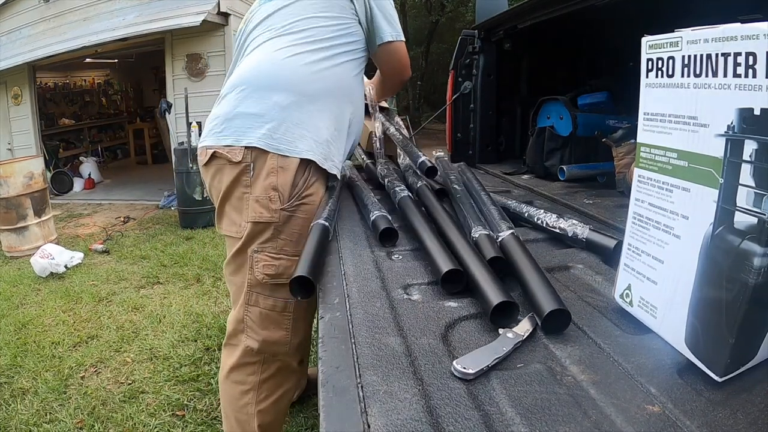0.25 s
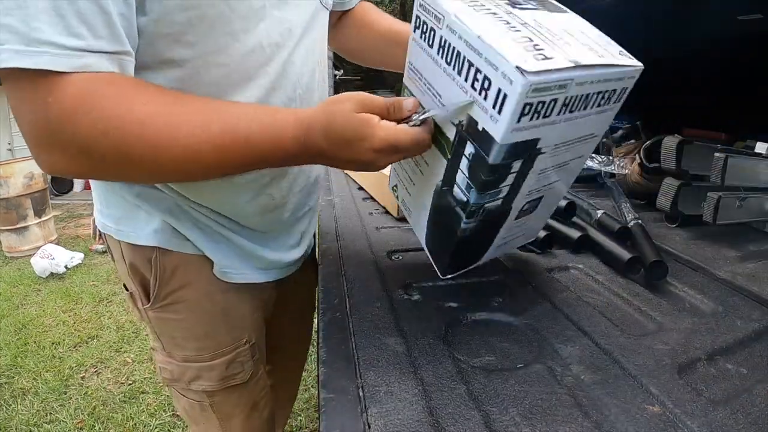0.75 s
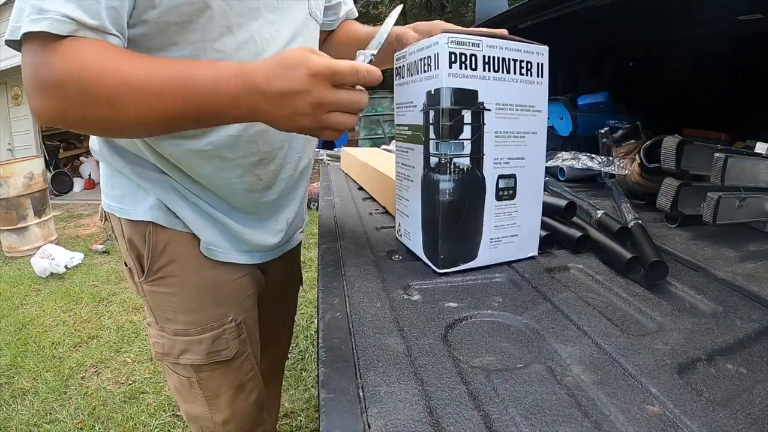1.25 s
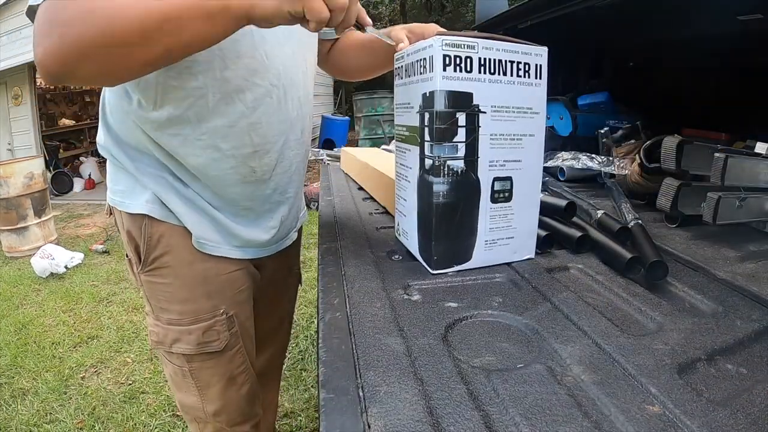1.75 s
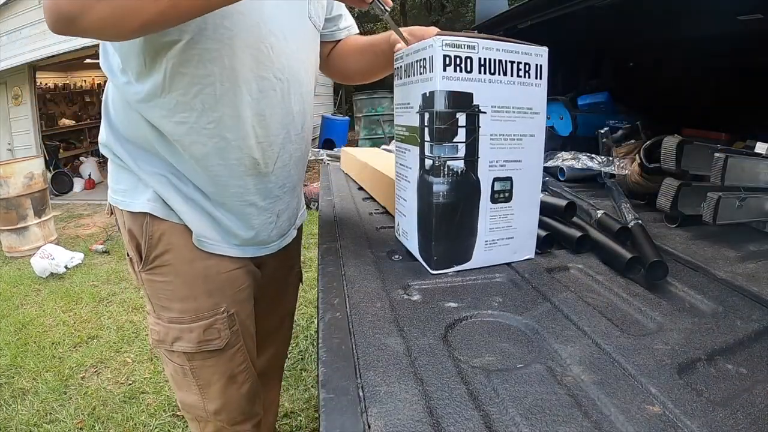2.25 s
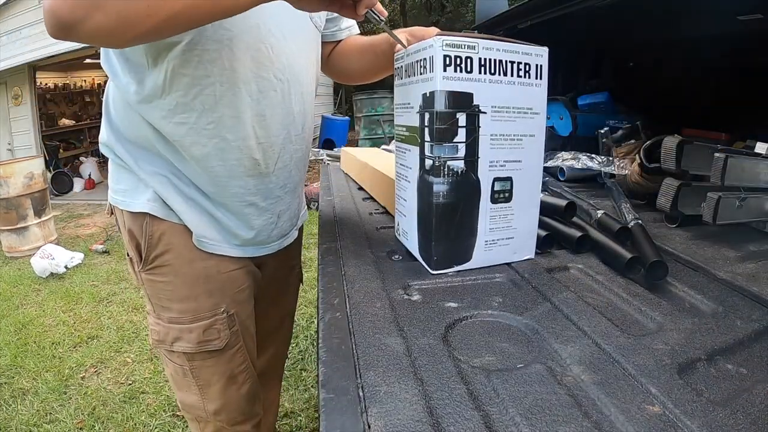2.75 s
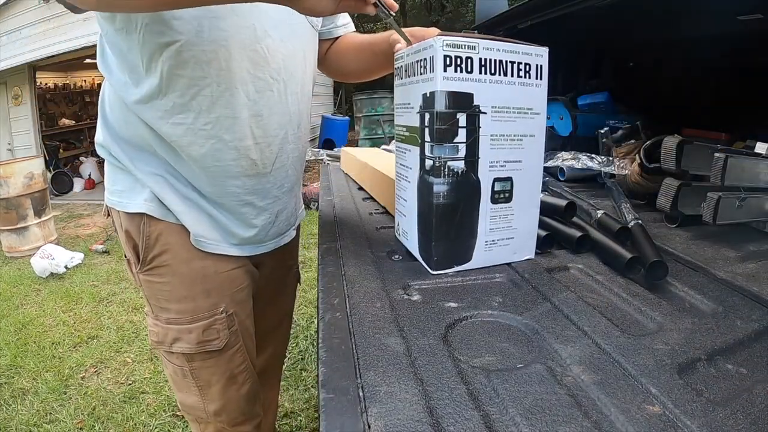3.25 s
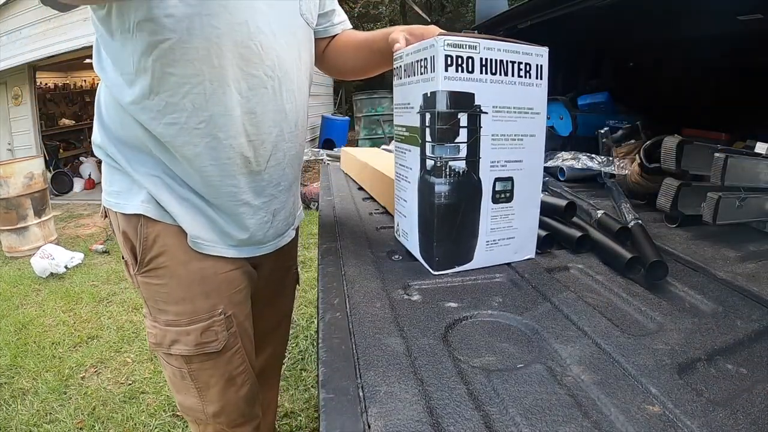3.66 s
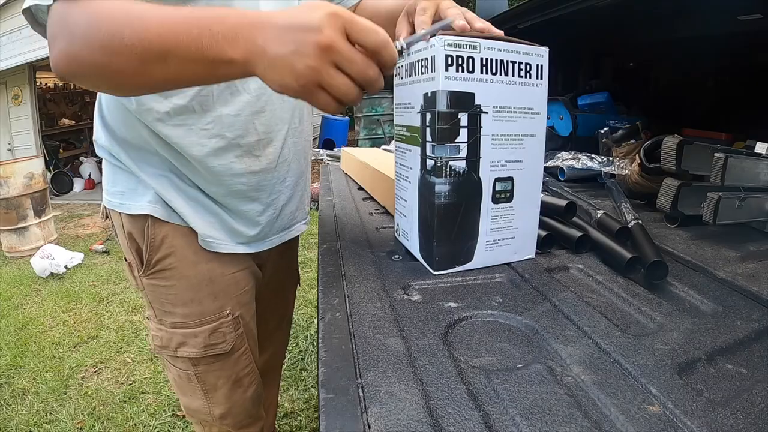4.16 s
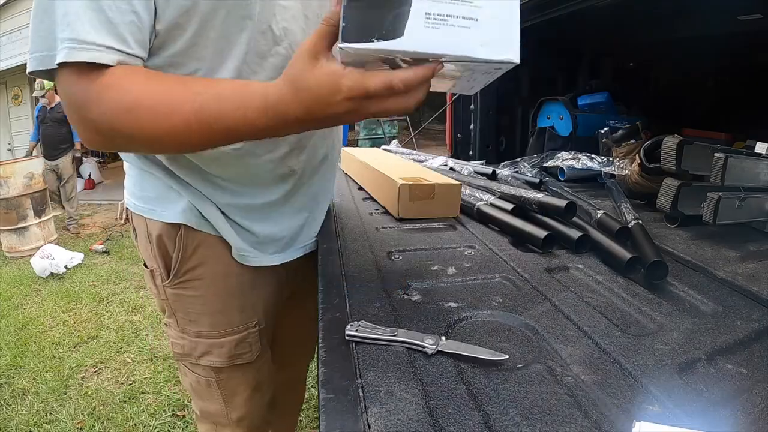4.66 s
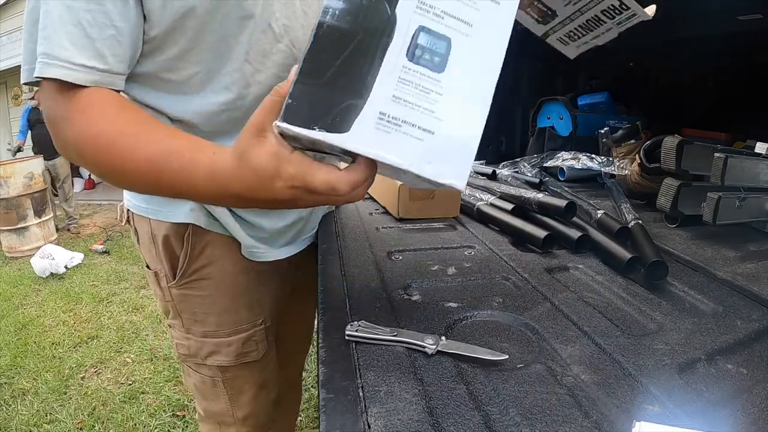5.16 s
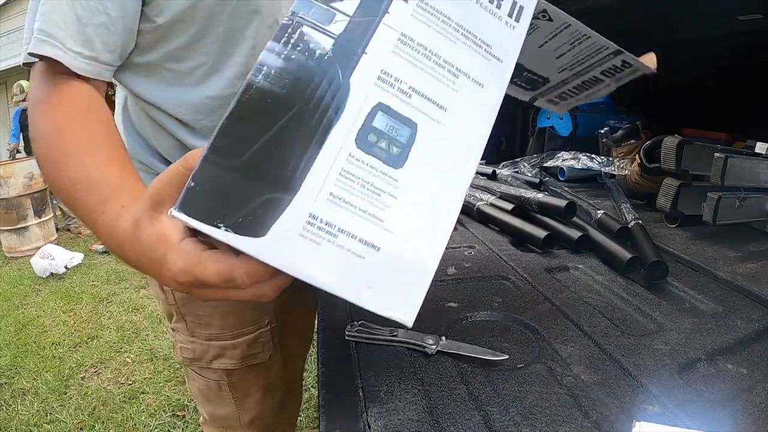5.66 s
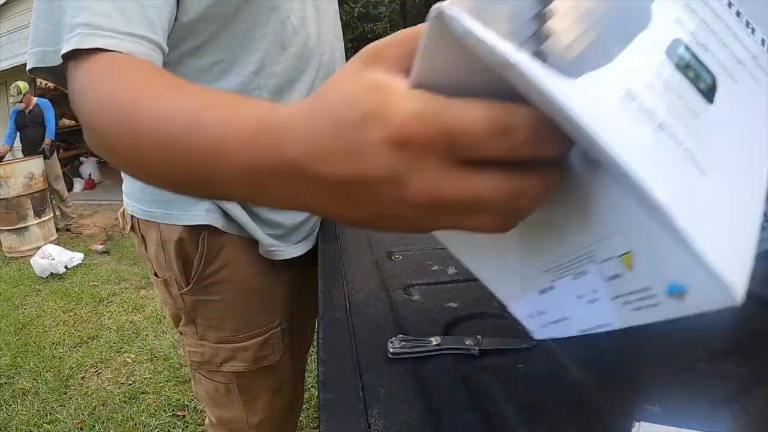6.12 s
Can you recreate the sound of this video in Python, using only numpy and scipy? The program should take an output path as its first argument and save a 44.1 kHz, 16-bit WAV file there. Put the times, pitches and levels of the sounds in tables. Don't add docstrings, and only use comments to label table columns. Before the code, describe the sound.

A burst of ringing metal pipes over sheet-steel thumps is cut short, and a carton drops onto the bed and rocks. After a near-quiet gap with low engine rumble, a small motor's throb and thin cicada hiss, sharp cracks open the carton. One bright metallic click follows, then cardboard scraping, squeaky edges and deep hollow thumps, captured close outdoors.

```python
import sys
import numpy as np
from scipy import signal
from scipy.fft import rfft, irfft, next_fast_len
from scipy.io import wavfile
from scipy.ndimage import uniform_filter1d

SR = 44100
rng = np.random.default_rng(int(sys.argv[2]) if len(sys.argv) > 2 else 0)


def gain_from_db(level_db):
    decades = np.asarray(level_db, float) / 20
    return 10 ** decades


def to_wav(sig):
    pcm = np.clip(np.atleast_2d(sig), -1, 1) * 32767
    pcm = np.round(pcm).astype(np.int16)
    wavfile.write(sys.argv[1], SR, pcm.T)


N = 281799
T = np.arange(N) / SR
PAD = next_fast_len(N + 8192)


def level(x, db):
    return x * gain_from_db(db) / np.sqrt(np.mean(x ** 2))


def colour(x, points):
    hz, db = np.transpose(points)
    log_hz = np.log(np.maximum(np.fft.rfftfreq(PAD, 1 / SR), 1))
    gain = gain_from_db(np.interp(log_hz, np.log(hz), db))
    return irfft(rfft(x, PAD) * gain, PAD)[..., :N]


def band(x, lo_hz, hi_hz):
    sos = signal.butter(2, [lo_hz, min(hi_hz, 0.45 * SR)], "band", fs=SR, output="sos")
    return signal.sosfilt(sos, x)


def walk(rate):
    k = int(SR / rate)
    held = np.repeat(rng.standard_normal(N // k + 1), k)
    return 1.58 * uniform_filter1d(uniform_filter1d(held, k), k)[:N]


def fade(t60, count):
    return np.exp(-np.log(1000) * np.arange(count) / SR / t60)


def ring(modes, scatter_db, count, rise=0.0031, detune=0.0023, loose=2, start=0):
    t = np.arange(count) / SR
    hz, db, t60 = np.transpose(modes)[:, :, None]
    luck = rng.standard_normal((3, len(modes), 1))
    swing = np.sin(2 * np.pi * hz * (1 + detune * luck[2]) * (t + start) + loose * luck[1])
    tones = gain_from_db(db + scatter_db * luck[0]) * np.exp(-np.log(1000) * t / t60) * swing
    return tones.sum(axis=0) * (1 - np.exp(-t / rise))


def burst(lo_hz, hi_hz, t60, count):
    x = rng.standard_normal(count) * fade(t60, count) * (1 - fade(t60 / 3, count))
    x = band(band(x, lo_hz, hi_hz), lo_hz, hi_hz)
    return x / np.abs(x).max()


def add(out, s, x):
    i = int(s * SR)
    out[i:i + len(x)] += x[:N - i]


def grit(rate, spread_db):
    slips = (rng.random(N) < rate / SR) * rng.standard_normal(N)
    return slips * gain_from_db(spread_db * rng.exponential(size=N))


def tuned(hz, rows):
    return np.column_stack([hz, rows])


# start in seconds, then levels in dB of the crack, the bed thud,
# the ring of the first tube and the ring of the second.
CLANKS = [(0.0045, -17, -19, -28, -48), (0.0136, -32, -9, -42, -49), (0.0617, -27, -14.5, -18, -43),
          (0.0798, -31, -16, -18, -29), (0.094, -21, -20, -28, -22), (0.1291, -28, -18.5, -27, -35),
          (0.164, -36, -19.5, -28.5, -36), (0.2526, -15.5, -14, -23.5, -27.5),
          (0.2826, -7, -27, -20.5, -25.5), (0.3212, -20, -10.5, -60, -42), (0.3467, -60, -14.5, -59, -32.5),
          (0.3734, -62, -22.5, -57, -32), (0.515, -44, -45, -41, -45), (0.033, -39, -22, -33, -42),
          (0.112, -22, -18.5, -32, -47), (0.44, -60, -34, -49, -49)]
# level in dB, t60 in seconds.
TUBE_A_HZ = [1184, 1930, 2234, 2480, 2786, 3225, 3278, 3516, 3849, 3887, 4457, 4565, 4985, 5259]
TUBE_A = [(0, 0.21), (-22.5, 0.18), (-23, 0.52), (-26, 0.47), (-8.5, 0.18), (-21, 0.25), (-21, 0.48),
          (-3.5, 0.17), (-24, 0.39), (-12, 0.16), (-15, 0.17), (-27, 0.21), (-24, 0.33), (-14.5, 0.14)]
TUBE_B_HZ = [1187, 1927, 1967, 2013, 2089, 2471, 2778, 2842, 3354, 3565, 3871, 3937, 4554, 4648]
TUBE_B = [(-9.5, 0.57), (-10.5, 0.58), (-11, 0.36), (-19.5, 0.71), (-21, 1.1), (-13.5, 0.55), (-20, 0.61),
          (-27.5, 1.7), (-25, 0.85), (-12.5, 0.36), (-18, 0.27), (-18, 0.8), (-23, 0.49), (-20, 0.28)]
RIMS_HZ = [926, 2261, 2363, 2546, 3990, 5368, 5610, 6121, 6218, 6342, 6724, 7402, 8387, 8656]
RIMS = [(-19, 0.17), (-31, 0.45), (-26, 0.58), (-28, 0.26), (2.5, 0.052), (-8.5, 0.25), (-21.5, 0.57),
        (-30.5, 0.32), (-22, 0.26), (-16, 0.31), (-26, 0.43), (-16, 0.22), (-6, 0.12), (-12, 0.045)]
# frequency in Hz, level in dB, t60 in seconds.
BED = [(97.5, -11, 0.15), (157.6, 4.5, 0.12), (206, -1.5, 0.33), (285, -4.5, 0.12), (382, -15, 0.24),
       (459.3, -6.5, 0.18), (740, 3.5, 0.027)]


def tubes():
    out = np.zeros(N)
    tube_a, tube_b, rims = tuned(TUBE_A_HZ, TUBE_A), tuned(TUBE_B_HZ, TUBE_B), tuned(RIMS_HZ, RIMS)
    luck = rng.random((30, 2))
    pile = np.transpose([1400 * 5 ** luck[:, 0], -24 - 8 * luck[:, 0], 0.036 + 0.21 * luck[:, 1] ** 2])
    for s, crack_db, thud_db, a_db, b_db in CLANKS:
        loudest_db = max(a_db, b_db)
        rings = gain_from_db(a_db) * ring(tube_a, 1.7, count=18000, detune=0, loose=0.74, start=s)
        rings += gain_from_db(b_db) * ring(tube_b, 1.2, count=18000, detune=0, loose=0.72, start=s)
        add(rings, 0, gain_from_db(loudest_db - 5) * ring(pile, 6.2, count=9000, detune=0.0034))
        add(rings, 0, gain_from_db((crack_db + loudest_db) / 2 - 7) * ring(rims, 0.74, count=10000, detune=0))
        bounces = (rng.random(1500) < 0.004) * rng.standard_normal(1500) * fade(0.12, count=1500) * 0.26
        bounces[0] = 1
        add(out, s, signal.fftconvolve(rings, bounces / np.linalg.norm(bounces)))
        add(out, s, gain_from_db(crack_db - 5) * burst(1500, 8700, 0.02, count=4000))
        add(out, s, gain_from_db(thud_db - 3) * burst(520, 4000, 0.027, count=4000))
        add(out, s, gain_from_db(thud_db - 3.5) * ring(BED, 2.5, count=9000, rise=0.00058, detune=0.053))
    return out * np.interp(T, [0.46, 0.6], [1, 0.05])


def knock(s, crack_db, crack_hz, top_hz, clap_db, thud_db, thud_hz):
    out = np.zeros(9000)
    crack_tone = ring([(crack_hz, 0, 0.011)], 1.3, count=2000, rise=0.00013, detune=0.03)
    add(out, 0, gain_from_db(crack_db - 8) * burst(crack_hz * 0.69, crack_hz * 1.25, 0.018, count=2000))
    add(out, 0.0004, gain_from_db(crack_db - 7.5) * crack_tone)
    add(out, 0, gain_from_db(crack_db - 5) * burst(crack_hz * 0.6, top_hz, 0.008, count=2000))
    add(out, 0.0006, gain_from_db(crack_db - 8) * burst(crack_hz * 0.36, top_hz * 1.22, 0.0019, count=2000))
    add(out, 0.0005, gain_from_db(clap_db - 0.5) * burst(956, 2160, 0.015, count=4000))
    add(out, 0.00143, gain_from_db(clap_db - 1) * burst(132, 1020, 0.034, count=4000))
    body = [(thud_hz, 0, 0.08), (thud_hz * 3.24, -13, 0.04), (thud_hz * 1.525, -5, 0.07),
            (thud_hz * 2.023, -9, 0.05), (thud_hz * 0.55, -8, 0.08), (470, -11, 0.05)]
    if s < 0.64:
        body += [(196.6, -1, 0.21), (205, -5, 0.28), (447, -2, 0.07), (915, -15, 0.2), (620, -4, 0.033)]
    add(out, 0.0022, gain_from_db(thud_db + 3) * ring(body, 2.1, count=8000, rise=0.0013, loose=0.69))
    return out


CARD_TOP_HZ, TAPE_TOP_HZ = 6500, 9950
# start in seconds, thud level in dB, thud frequency in Hz, edge in dB over the thud.
BOX_BUMPS = [(0.632, -13, 190, -9), (.635, -20, 189, 2), (0.6461, -13.5, 161, -18), (0.7783, -21.5, 225, -5),
             (0.82, -23.5, 118.5, 4.5), (.828, -15.5, 130, -21), (0.8343, -13, 180, -28),
             (0.8687, -24.5, 183, -7), (0.933, -35, 375, -4), (1.035, -32, 109, -19), (1.053, -27.5, 120, -7),
             (1.076, -26.5, 112, -4.5), (1.113, -45, 175, 9), (1.388, -44.5, 320, 10.5),
             (1.709, -38.5, 372, 0.5), (3.3418, -29, 122, 6.5), (3.362, -28.5, 131, 3),
             (3.5527, -23, 165, -7),
             (5.3519, -22, 190, -24), (5.38, -26.5, 236, -18), (5.4367, -29, 120, 11),
           (5.451, -19.5, 252, -17), (5.499, -24.5, 114, -2), (5.6484, -28, 266, -10),
           (5.7093, -20, 144, -17), (5.732, -22.5, 144, -9), (5.808, -29, 400, -19),
           (5.858, -18.5, 106, -28), (5.8674, -25.5, 734, -3), (5.936, -15, 94, -22),
           (6.0028, -13, 148, -29), (6.057, -21, 206, -12), (6.088, -21, 141, -34), (6.16, -37.5, 168, -24),
           (6.353, -45, 124, 2.5)]


def bumps():
    out = np.zeros(N)
    for s, db, hz, edge_db in BOX_BUMPS:
        clap_db = db + 0.28 * edge_db - 5.5
        add(out, s - 0.0005, knock(s, db + edge_db, 3040, CARD_TOP_HZ, clap_db, db, hz))
    return out


# start in
# seconds, crack level in dB, crack frequency in Hz, clap level in dB.
SNAPS = [(2.9679, -11, 1870, -21.5), (3.016, -46, 3180, -60), (3.026, -41, 2500, -44),
         (3.032, -19.5, 2130, -32), (3.042, -33, 2500, -63), (3.0489, -28, 2350, -60),
         (3.054, -20.5, 4640, -25), (3.159, -36, 4700, -73), (3.3338, -26, 2750, -48),
         (3.5294, -15, 3960, -23.5), (3.542, -26, 3900, -22.5), (3.6435, -24, 1770, -37.5),
         (0.582, -50, 2017, -62), (.597, -46, 2515, -60), (0.61, -40, 3200, -61), (1.362, -54, 3360, -58),
         (1.378, -53, 3050, -58), (4.858, -48, 1640, -48), (5.7144, -23.5, 2750, -29),
         (5.81, -31, 2880, -36), (5.8675, -24, 2930, -23), (5.3505, -41, 1500, -30),
         (5.534, -38, 2000, -42), (4.6573, -44, 3780, -41), (4.766, -39.5, 3550, -44),
         (5.9868, -17, 8340, -55)]
TICKS = [
    (3.386, -38, 3500, -40),
    (3.423, -50, 4000, -66),
    (3.4291, -37, 4130, -45),
    (3.466, -44, 4000, -60),
    (3.485, -36, 3280, -62),
    (5.624, -55, 1600, -47),
    (5.738, -25, 2570, -29),
    (5.853, -35, 1600, -29),
    (6.158, -34, 2000, -57),
]


def snaps():
    out = np.zeros(N)
    for rows, top_hz in [(SNAPS, TAPE_TOP_HZ), (TICKS, CARD_TOP_HZ)]:
        for s, db, hz, clap_db in rows:
            add(out, s - 0.0005, knock(s, db, hz, top_hz, clap_db, clap_db - 7.5, 243))
    return out


# start in seconds, level in dB.
FOLDS = [
    (4.3457, -33),
    (4.3514, -35),
    (4.3554, -12),
]
# frequency in Hz, level in dB, t60 in seconds.
KNIFE = [(2400, -5.5, 0.014), (4330, 5, 0.0057), (6160, 0, 0.0087), (7940, -16, 0.015),
         (8640, -8.5, 0.0065), (10000, -8, 0.008), (12300, -22, .01)]


def folds():
    out = np.zeros(N)
    for s, db in FOLDS:
        add(out, s, gain_from_db(db - 6) * ring(KNIFE, 1.5, count=2000, rise=0.0001))
        add(out, s, gain_from_db(db - 15.5) * burst(1540, 9300, 0.024, count=2000))
        add(out, s, gain_from_db(db - 3.5) * burst(800, 10000, 0.0022, count=2000))
        add(out, s, gain_from_db(db - 34) * burst(220, 1300, 0.045, count=2000))
    return out


# start in seconds, level in dB, frequency in Hz, t60 in seconds.
PINGS = [(.004, -22, 154, 0.065), (.346, -10, 170, 0.075), (.6308, -10, 830, 0.0091),
         (.635, -23, 196, 0.15), (.66, -13, 204.5, 0.2), (.698, -23, 1240, 0.071),
         (5.809, -21, 1076, 0.036), (6.058, -22, 626, 0.02), (5.436, -18.5, 1520, 0.016),
         (5.352, -30, 1220, 0.017), (.779, -37, 325, 0.065), (.832, -30, 187, 0.048),
         (.872, -19.5, 190, 0.17), (2.969, -18, 1400, 0.012), (3.055, -20, 4380, 0.01),
         (3.056, -16.5, 1390, 0.01), (3.343, -26, 1156, 0.031), (3.5295, -19.5, 4360, .014),
         (3.6444, -25, 1736, 0.026), (3.6445, -27, 3600, 0.014), (5.661, -17.5, 136, 0.2),
         (5.72, -21, 165, 0.4), (5.76, -17, 126, 0.21), (5.862, -16, 132, 0.23), (5.95, -11, 96, 0.12),
         (6.005, -19.5, 149, 0.13), (5.27, -29.5, 265, 0.11), (5.36, -31, 299, 0.26)]


def pings():
    out = np.zeros(N)
    for s, db, hz, t60 in PINGS:
        tone = ring([(hz, 0, t60)], 0, count=12000, rise=t60 / 30, detune=0, loose=0)
        add(out, s, gain_from_db(db) * tone)
    return out


def scuffs(rows, peak_db, hiss_db):
    out = np.zeros(N)
    for s, length, rasp_db, hz in rows:
        rough = rng.standard_normal(12000) * gain_from_db(1.3 * rng.exponential(size=12000))
        swell = np.sin(np.pi * np.clip(np.arange(12000) / SR / length, 0, 1)) ** 0.9
        peak = band(band(rough, hz * 0.862, hz * 1.074), hz * 0.5, hz * 1.57)
        skirt = band(band(rough, hz * 0.31, hz * 1.79), 60, min(hz * 4.8, 4500))
        overtone = band(rough, hz * 3.0, hz * 3.2)
        hiss = band(band(rough, 1470, 8200), 670, 5400)
        rasp = level(peak, rasp_db + peak_db) + level(skirt, rasp_db + 1.5)
        rasp += level(overtone, rasp_db + peak_db - 14 - 30 * (hz > 2000))
        add(out, s, swell * (rasp + level(hiss, rasp_db + hiss_db)))
    return out


# start in seconds, length in seconds, rasp level in dB, rasp frequency in Hz.
SCUFFS = [(0.63, 0.043, -29, 844), (0.662, 0.026, -34.5, 1220), (0.694, 0.021, -28.5, 1147),
          (.826, 0.038, -30, 503), (1.366, 0.088, -53, 1140), (1.836, 0.12, -59, 1630),
          (3.642, 0.0095, -37, 1660), (4.11, 0.087, -54, 1020), (5.262, 0.02, -35, 323),
          (5.32, 0.1, -39, 450), (5.434, 0.071, -31.5, 1560), (5.642, 0.13, -43.5, 1530),
          (5.73, 0.053, -40, 2570), (5.799, 0.024, -39.5, 935), (5.885, 0.043, -44, 1480),
          (6.363, 0.051, -46.5, 1750)]
BRUSHES = [(0.99, 0.027, -74, 3410), (1.113, 0.035, -52, 2010), (1.209, 0.041, -46, 2630),
           (1.237, 0.032, -41, 1170), (1.536, 0.016, -51, 1370), (2.071, 0.042, -56, 1620),
           (2.157, 0.07, -55.5, 1350), (2.618, 0.25, -57, 2400), (4.11, 0.097, -54.5, 2500),
           (6.151, 0.036, -49, 1720), (5.434, 0.061, -35.5, 3000), (.819, 0.025, -40.5, 2500),
           (6.35, 0.012, -52, 2480)]
SQUEAKS = [(.672, 0.023, -45.5, 3300), (.695, 0.023, -48, 3100), (.51, 0.017, -50.5, 1290),
           (.715, 0.022, -61, 1010), (.78, 0.012, -50, 820), (.935, 0.012, -45.5, 883),
           (.98, 0.048, -63.5, 3680), (1.076, 0.02, -50.5, 914), (1.15, 0.031, -60, 1060),
           (1.222, 0.011, -58, 2450), (1.385, 0.056, -63.5, 890), (3.34, 0.015, -49, 1190),
           (4.885, 0.072, -52, 338), (4.915, 0.017, -53, 2400), (4.93, 0.029, -52, 1190),
           (5.01, 0.019, -52, 1520), (5.0, 0.027, -54, 4000), (5.01, 0.062, -53, 5000),
           (5.36, 0.051, -61, 2400), (5.44, 0.064, -47, 3140), (5.47, 0.017, -51, 1520),
           (5.6, 0.055, -57, 1630), (5.648, 0.045, -43.5, 620), (5.71, .012, -45, 2700),
           (5.73, 0.049, -46.5, 1620), (5.76, 0.036, -46, 610), (5.845, 0.034, -48.5, 1580),
           (5.865, 0.031, -43, 695), (5.81, 0.032, -50, 1090), (5.9, 0.039, -50, 1790),
           (5.92, 0.028, -51.5, 990), (5.95, 0.034, -57, 890), (6.05, 0.046, -51, 800)]


def strokes():
    card = scuffs(SCUFFS, peak_db=-1, hiss_db=-54)
    fingers = scuffs(BRUSHES, peak_db=-28, hiss_db=-1)
    edges = scuffs(SQUEAKS, peak_db=10.5, hiss_db=-54)
    return card + fingers + edges


# frequency in Hz, width in Hz, level in dB.
BOX = [(1170, 300, 0.5), (1630, 110, -15), (2660, 110, -17), (3840, 45, 3), (5070, 56, -24)]
# frequency in Hz, density in dB per Hz.
HOLLOW = [(50, -36), (85, 6), (150, -0.5), (200, 1), (260, -2), (350, -4), (500, -15), (1000, -64)]
HISS = [(2500, -18), (4000, 1), (5500, -1), (8000, -4.5), (10000, -8), (13000, -21), (16000, -22)]


def rubbing(boom_db, rasp_db, scrape_db, hiss_db):
    f = np.geomspace(200, 16000, num=200)
    panel = 0.96 + sum(gain_from_db(db) / np.sqrt(1 + (2 * (f - hz) / width) ** 2) for hz, width, db in BOX)
    board = np.column_stack([f, 20 * np.log10(panel)])
    jerk_db = 1.5 * walk(22) + 1.2 * walk(70)
    lumps_db = 2.2 * walk(18)
    boom_gain, scrape_gain = gain_from_db(boom_db + lumps_db), gain_from_db(scrape_db + jerk_db)
    hiss_gain = gain_from_db(hiss_db + jerk_db)
    boom = level(colour(grit(700, 1.0), HOLLOW), 0) * boom_gain
    rasp = level(band(grit(2000, 0.21), 153, 677), 0) * gain_from_db(rasp_db + jerk_db + 0.33 * lumps_db)
    scrape = [level(band(colour(grit(9000, 1.0), board), 1044, 3300), 0) * scrape_gain for _ in range(2)]
    hiss = [level(colour(grit(12000, 0.66), HISS), 0) * hiss_gain for _ in range(2)]
    rattle = level(band(grit(700, 1.17), 91, 138), 0) * boom_gain
    near = boom + rasp + scrape[0] + hiss[0]
    edges = gain_from_db(-14.5) * scrape[1] + gain_from_db(-7) * hiss[1] + gain_from_db(-15) * rattle
    return near, edges


# time in seconds, weight in dB, slip in dB.
DRAG = [
    (0.0, -26, -25),
    (0.134, -27.5, -39.5),
    (0.22, -23, -40),
    (0.306, -15, -31),
    (0.418, -27.5, -50.5),
    (0.6, -51, -50.5),
]
SETTLE = [
    (0.62, -31.5, -50),
    (0.786, -36, -54.5),
    (0.91, -51, -58.5),
    (1.048, -45.5, -56),
    (1.23, -43, -53),
    (1.396, -47, -61),
    (1.52, -55.5, -70.5),
]
CUT = [(1.786, -58, -59.5), (2.068, -56, -63), (2.392, -57.5, -71), (2.854, -61.5, -62.5),
       (2.95, -52, -61.5), (2.98, -36.5, -55), (3.152, -50, -64.5), (3.348, -60.5, -61),
       (3.52, -40.5, -52.5), (3.55, -36, -44.5), (3.66, -47, -48.5), (3.68, -49.5, -58.5),
       (4.064, -56.5, -60.5), (4.38, -60.5, -70.5), (4.592, -49, -54), (4.728, -43.5, -60),
       (4.85, -52, -53.5)]
SLIDE = [
    (4.87, -41, -47),
    (4.91, -37, -47.5),
    (4.925, -29, -40),
    (4.95, -39, -39.5),
    (4.99, -39.5, -36),
    (5.049, -37, -36),
    (5.099, -40, -37),
    (5.221, -44, -43),
    (5.255, -42, -38.5),
]
TURN = [(5.27, -30, -45.5), (5.4, -41, -46.5), (5.466, -36.5, -54.5), (5.6, -37, -48), (5.688, -27, -42),
        (5.78, -35.5, -38), (5.84, -40, -45), (5.88, -18.5, -41.5), (5.93, -24.5, -45.5),
        (5.99, -32, -51.5), (6.04, -25, -50.5), (6.07, -21, -47), (6.1, -25, -53.5), (6.14, -35.5, -54),
        (6.19, -48.5, -65), (6.32, -74, -61.5), (6.39, -28.5, -59)]


def handling():
    surfaces = [(DRAG, 2.2, -14.5), (SETTLE, -5.5, -9.5), (CUT, -12.5, -7), (SLIDE, -4.5, -1.1),
                (TURN, -0.87, -12)]
    rows = [(s, weight, (weight + slip) / 2 + rasp_db, slip, slip + hiss_db)
            for act, rasp_db, hiss_db in surfaces for s, weight, slip in act]
    s, *columns = np.transpose(rows)
    return rubbing(*(np.interp(T, s, column) for column in columns))


def spread(points, db, like):
    mid, side = rng.standard_normal((2, N))
    return level(colour(np.array([mid + like * side, mid - like * side]), points), db)


# frequency in Hz, density in dB per Hz.
RUMBLE = [(8.8, -48), (15, -22), (35, -5), (54, 0), (64, -3), (72, -8), (86, -21), (96, -31), (113, -23),
          (140, -24), (180, -54), (310, -120)]
AIR = [(47, -34), (80, 0.5), (161, -17), (526, -26.5), (833, -34.5), (1180, -20), (1350, -26.5),
       (2040, -33), (6390, -36), (7950, -44), (15000, -70)]


def engine_and_air():
    swell_db = 1.5 * walk(4.21)
    return spread(RUMBLE, -36, like=0.028) * gain_from_db(swell_db) + spread(AIR, -54, like=0.56)


# time in seconds, whine frequency in Hz, level in dB.
MOTOR = [
    (.6, 1190, -106),
    (1.099, 1180, -62.5),
    (2.8, 1178, -64),
    (4.4, 1192, -63),
    (4.8, 1157, -65),
    (6.3, 1230, -82),
]


def motor():
    s, hz, db = np.transpose(MOTOR)
    throb_hz = 23.9 * (1 + 0.022 * walk(2.49))
    throb = 1 + 0.86 * np.cos(2 * np.pi * np.cumsum(throb_hz) / SR)
    whine = np.sin(2 * np.pi * np.cumsum(np.interp(T, s, hz) + 7 * walk(30)) / SR)
    whine += level(band(rng.standard_normal(N), 890, 1160), -10)
    return whine * throb * gain_from_db(np.interp(T, s, db) + 1.5 * walk(5))


def cicadas():
    centre_hz = 7880
    buzz = 1 + 0.15 * np.cos(2 * np.pi * 48 * T)
    chorus = band(rng.standard_normal((2, N)), centre_hz - 490, centre_hz + 490)
    chorus += band(rng.standard_normal((2, N)), centre_hz - 120, centre_hz + 120) * 0.78
    return level(chorus * buzz, -67.5) * gain_from_db(0.37 * walk(3.9))


# frequency in Hz, radians by which the left leads.
PORT_PHASE = [(0, 0), (2500, -.8), (5400, -1.3), (9000, -1.3), (16000, -1.5)]
# frequency in Hz, left minus right in dB.
PORT_DB = [(30, 0), (80, -2), (400, -1.4), (800, -2), (1500, -2), (2800, -1), (5500, -2.8), (9000, -6),
           (15000, -5.5)]


def ports(x):
    f = np.fft.rfftfreq(PAD, 1 / SR)
    turn = np.exp(1j * np.interp(f, *np.transpose(PORT_PHASE)))
    late = irfft(rfft(x, PAD) * turn, PAD)[:N]
    noise = rng.standard_normal((2, 2, 6000))
    close = gain_from_db(-31.5) * band(band(noise[0], 3900, 20000), 3900, 20000) * fade(0.031, count=6000)
    far = gain_from_db(-38) * band(noise[1], 274, 9400) * fade(0.11, count=6000)
    echo = signal.fftconvolve(x[None], close + far, axes=1)[:, :N]
    return np.array([colour(late, PORT_DB), x]) + echo


def scene():
    near, edges = handling()
    box = bumps() + snaps() + folds() + pings() + strokes() + near
    yard = engine_and_air() + motor() + cicadas()
    return ports(tubes() + box) + edges * np.array([[1], [-1]]) + yard


def band_limit(x):
    return signal.sosfilt(signal.butter(12, 15560, fs=SR, output="sos"), x)


def record(dry):
    finished = np.tanh(0.86 * dry) / 0.76
    return band_limit(finished)


dry = scene()
out = record(dry)
to_wav(out)
```